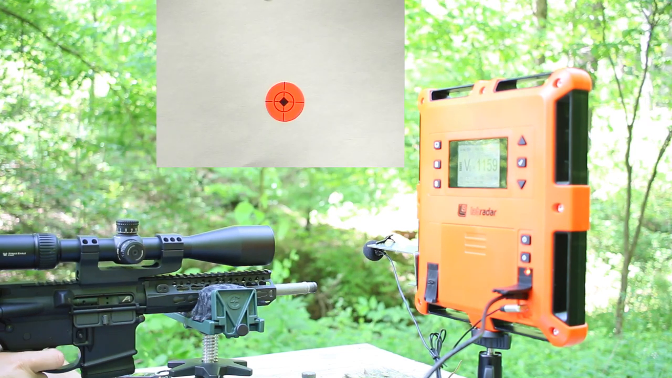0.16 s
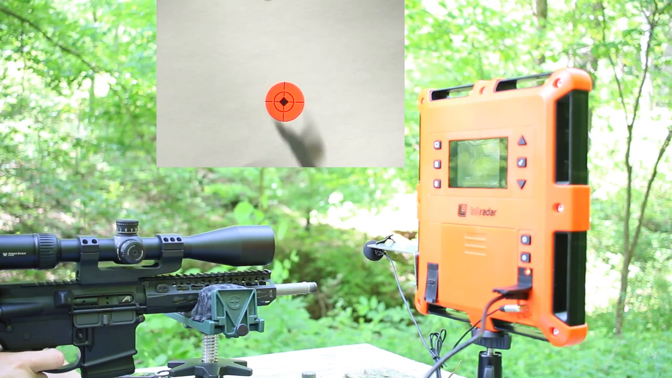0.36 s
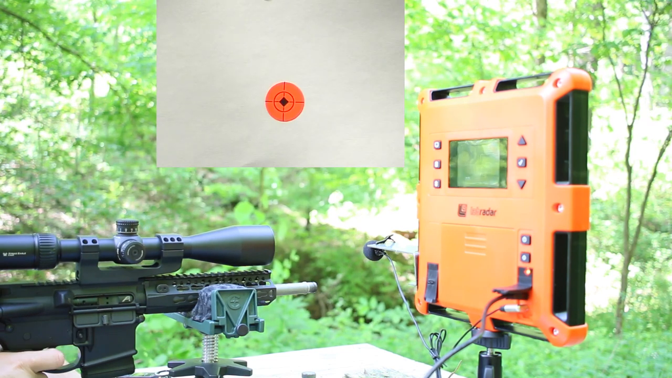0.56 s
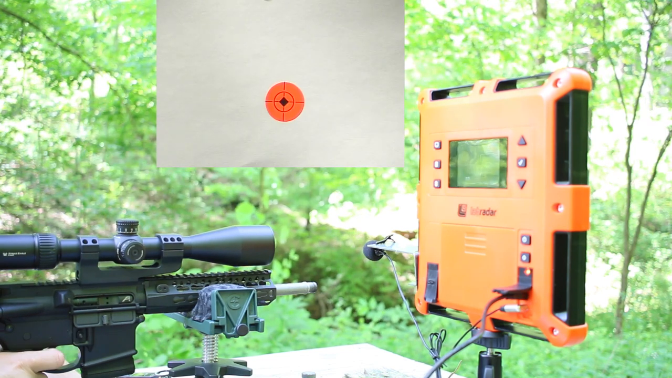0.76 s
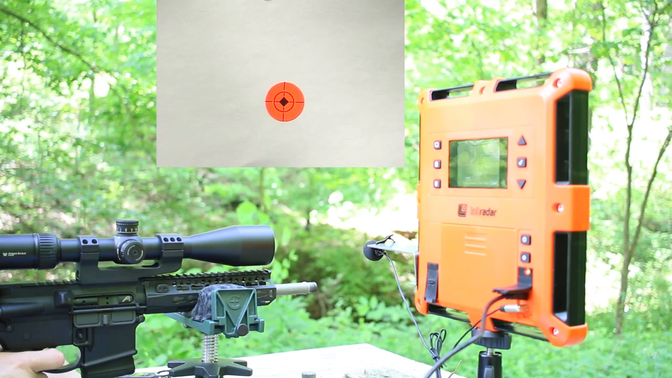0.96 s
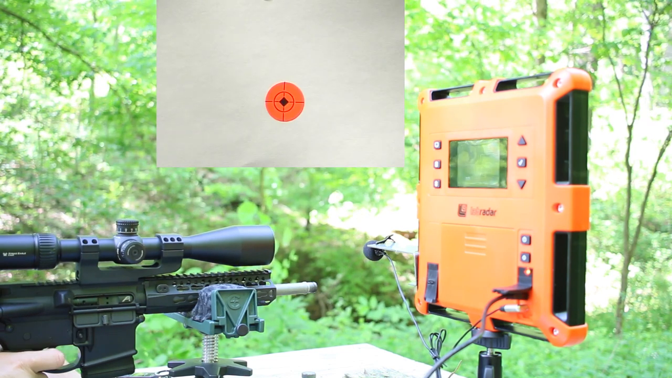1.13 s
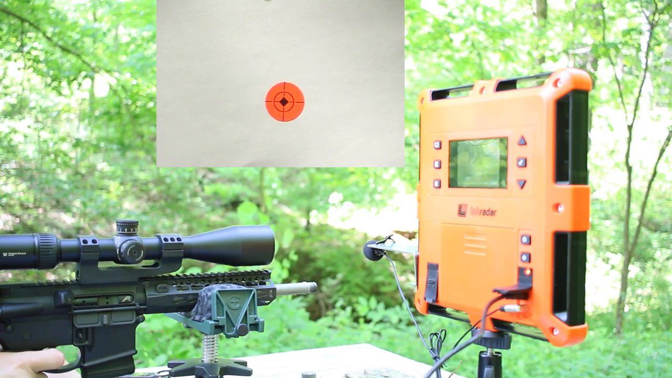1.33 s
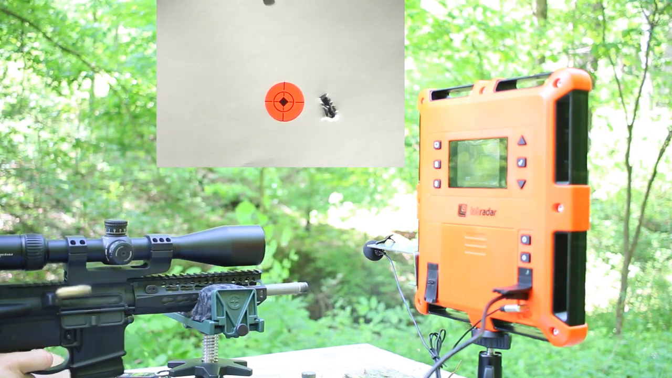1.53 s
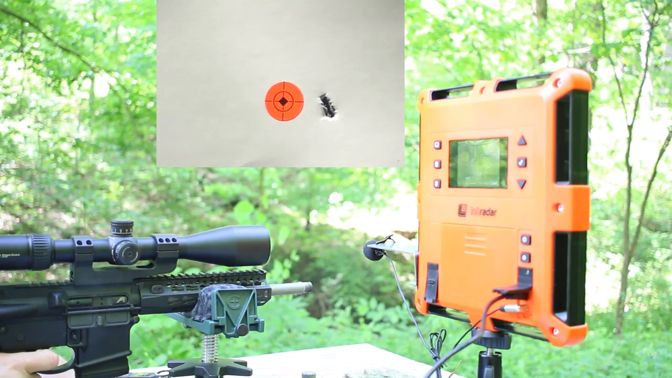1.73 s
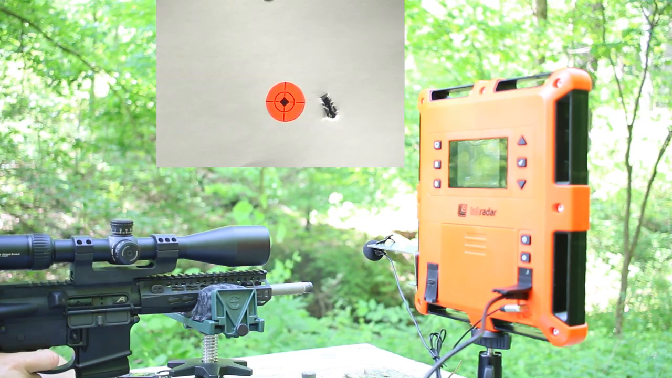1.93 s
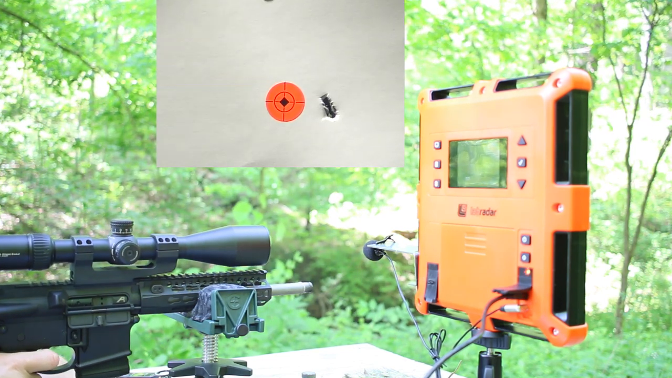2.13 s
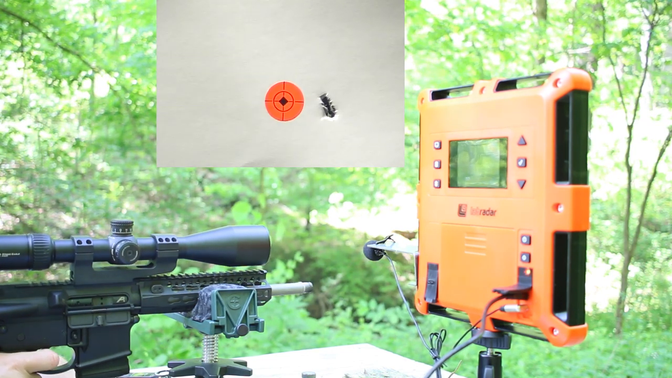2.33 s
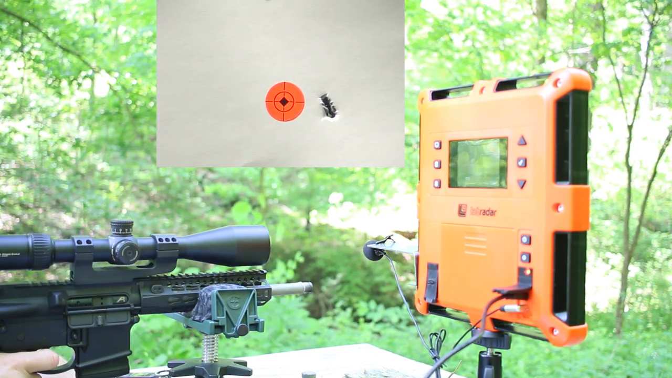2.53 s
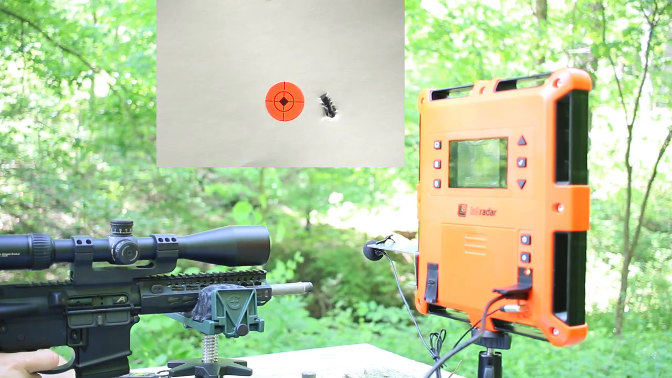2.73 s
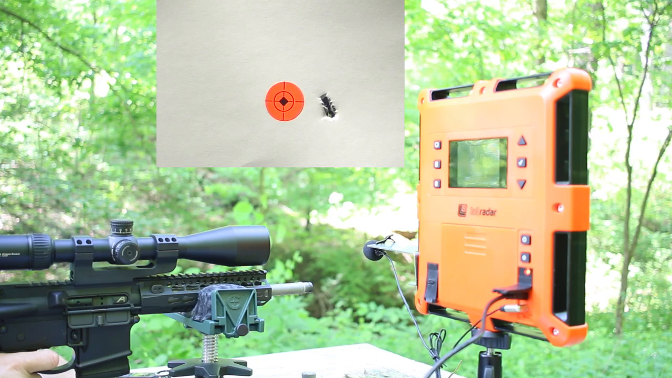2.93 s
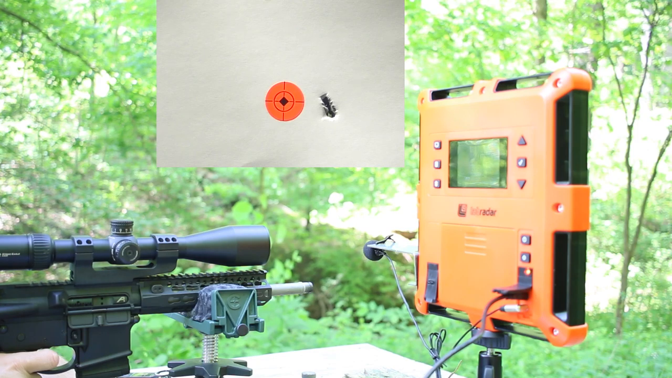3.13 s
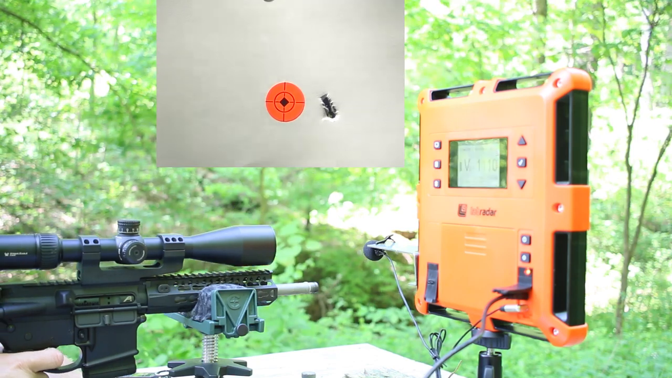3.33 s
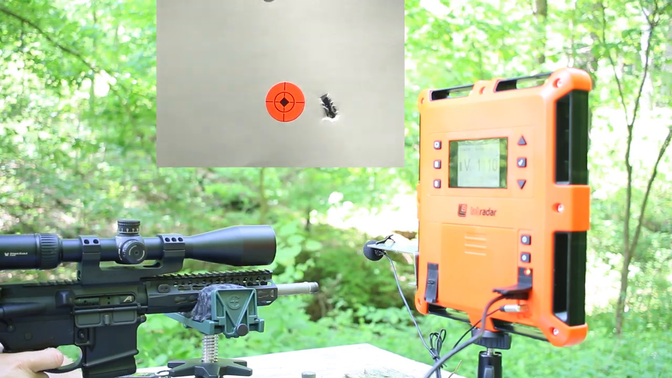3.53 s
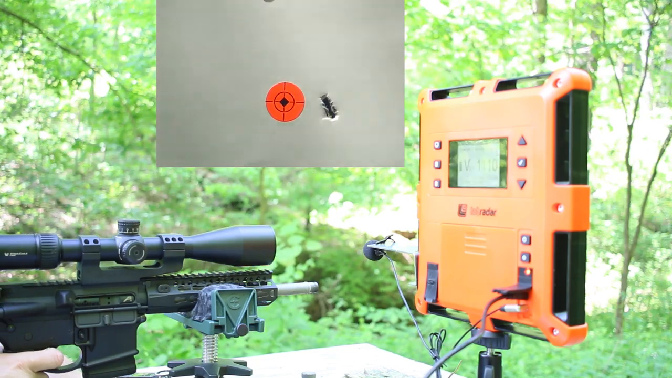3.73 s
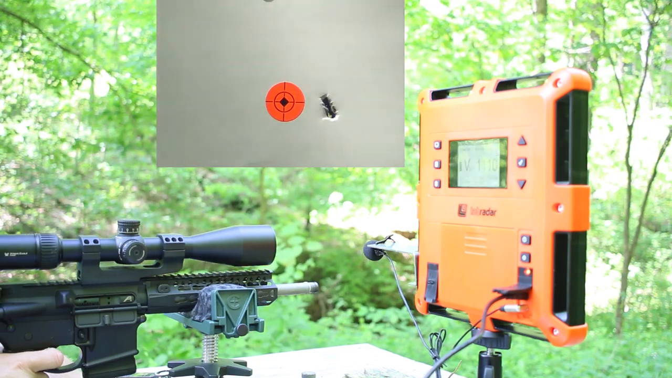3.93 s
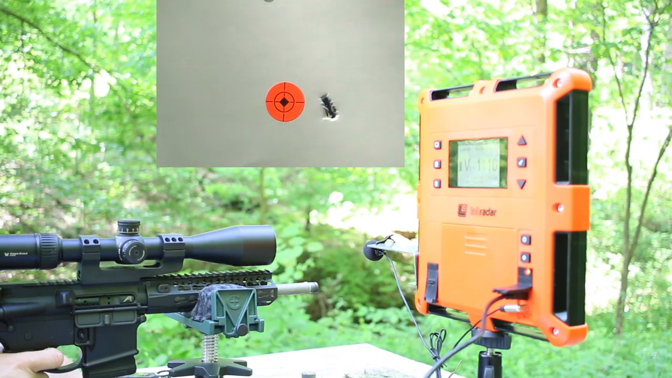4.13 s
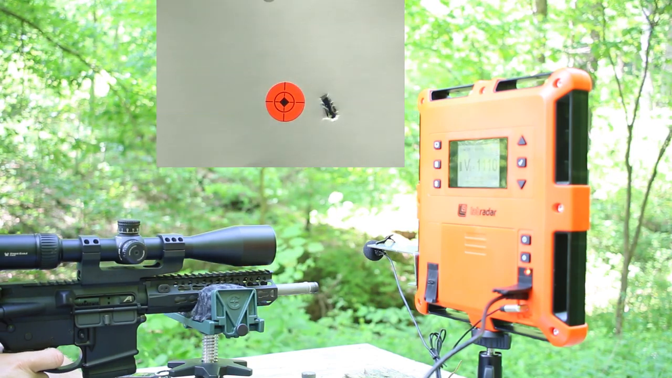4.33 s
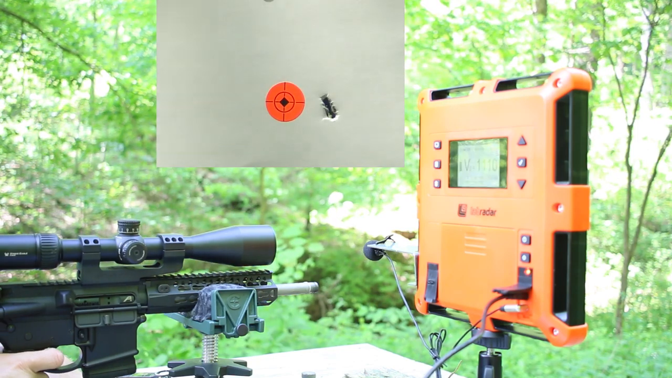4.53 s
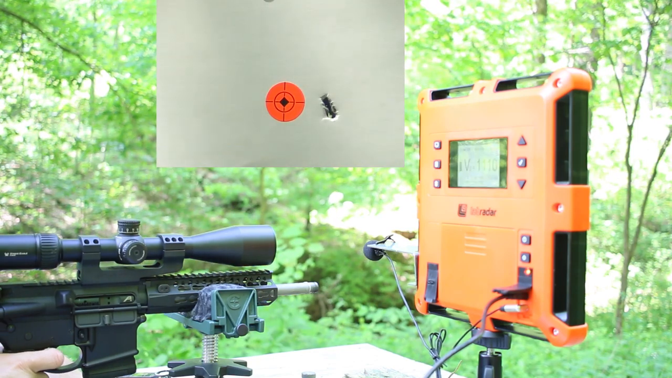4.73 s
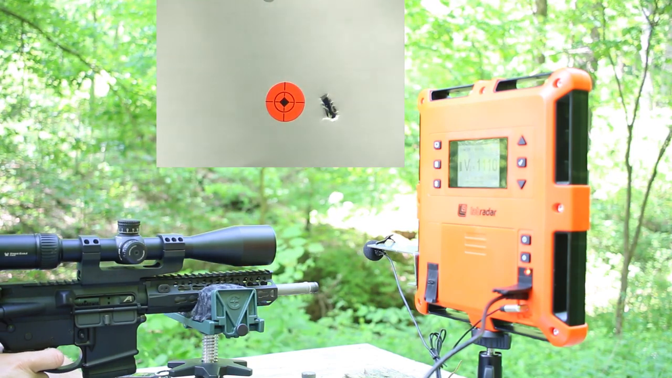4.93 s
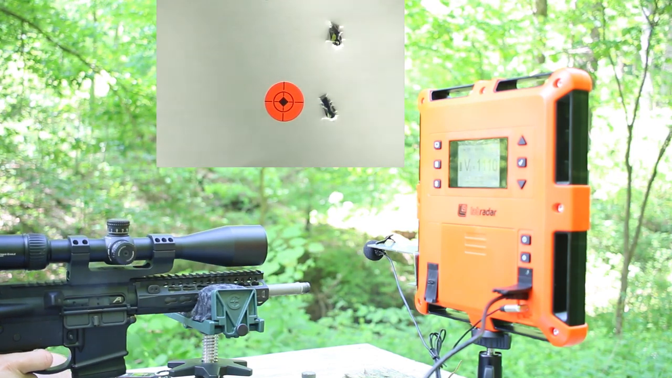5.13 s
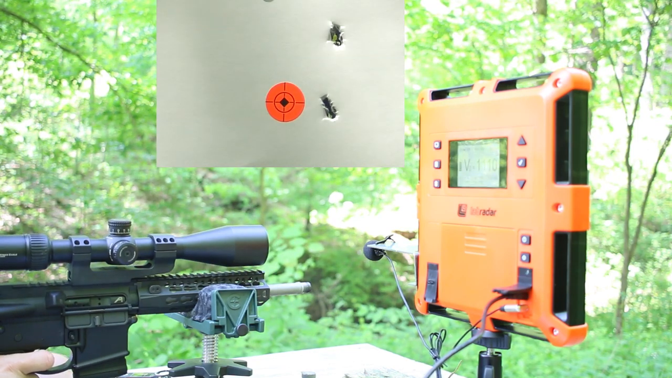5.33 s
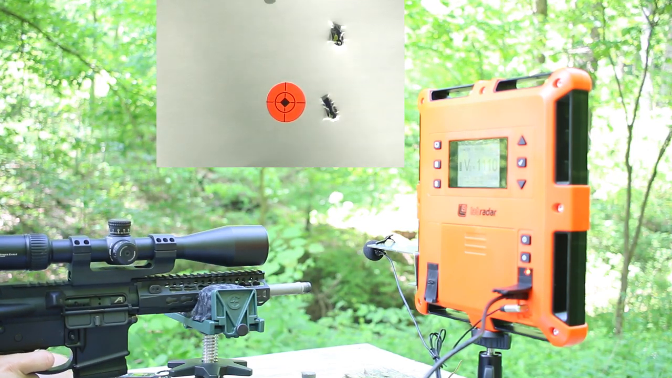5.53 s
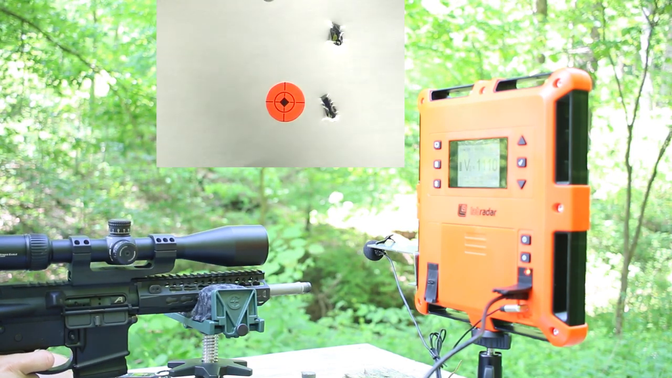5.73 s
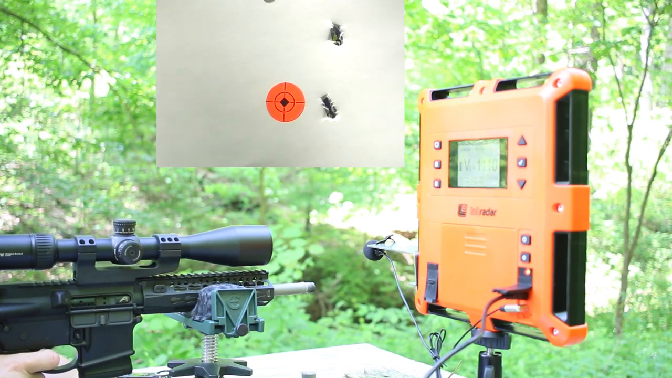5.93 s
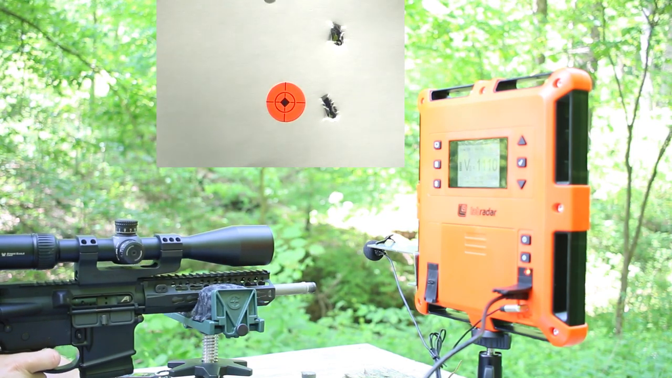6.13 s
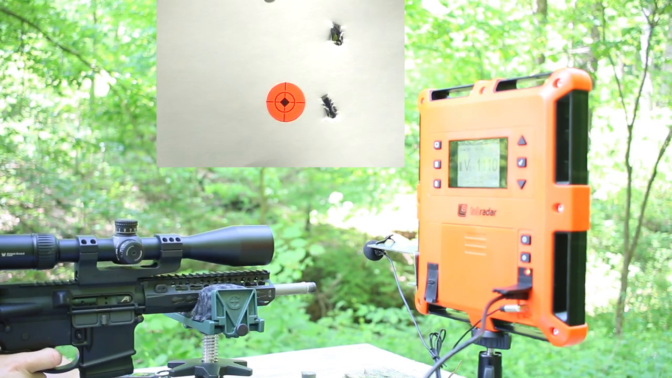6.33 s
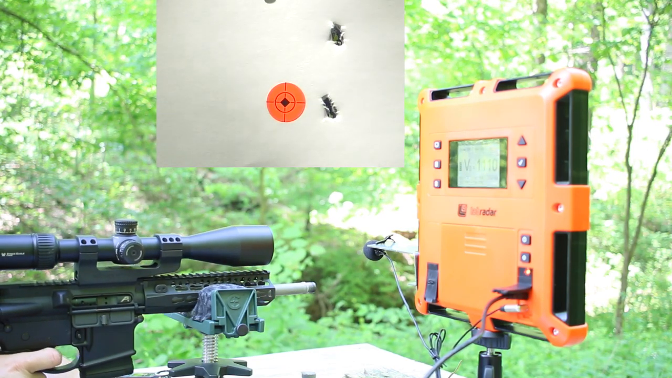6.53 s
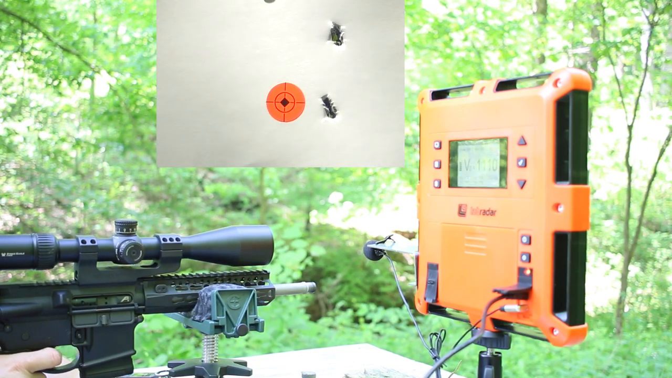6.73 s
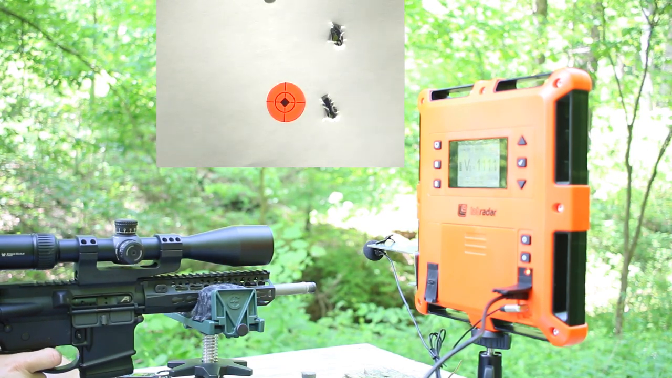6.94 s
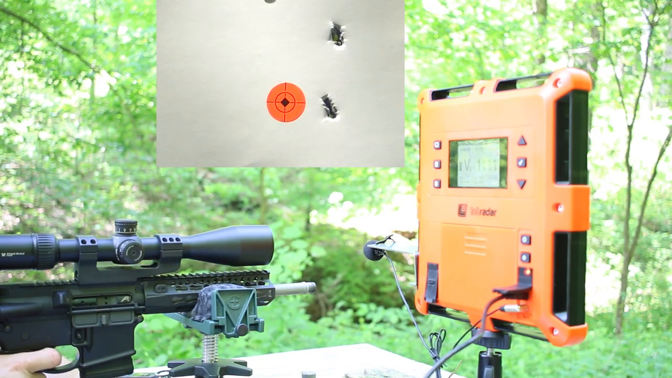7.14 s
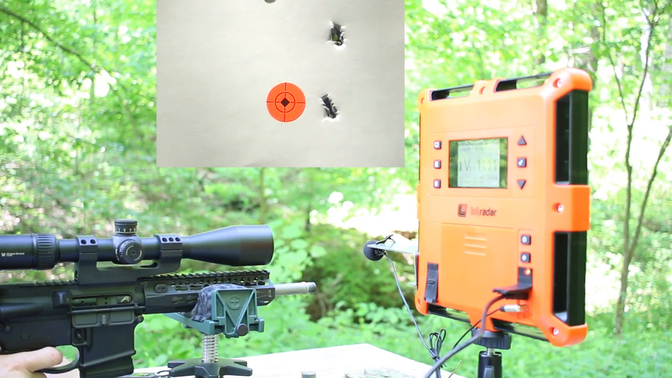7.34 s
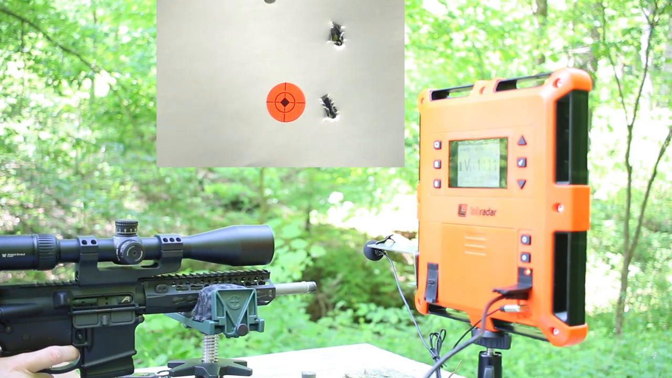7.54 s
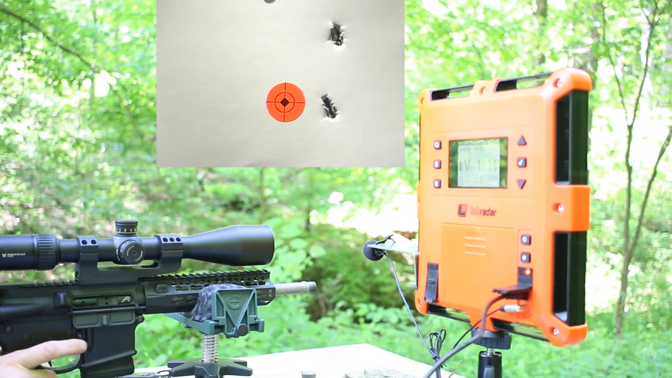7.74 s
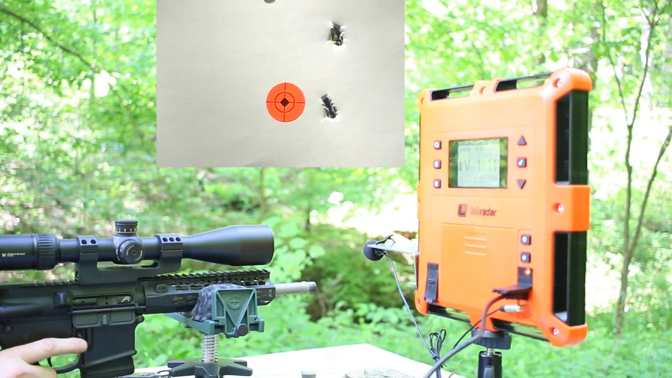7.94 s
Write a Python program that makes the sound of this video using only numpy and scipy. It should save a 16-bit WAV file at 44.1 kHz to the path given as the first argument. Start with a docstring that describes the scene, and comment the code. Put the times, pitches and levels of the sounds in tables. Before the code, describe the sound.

In still woodland air with a very faint hum, a rifle shot cracks right beside the microphone, distorting and rolling away among the trees. A brass case ticks as it lands. A second, equally loud shot follows with its own long echo and tick. As it fades, the trigger gives one crisp steel click, and quiet cloth rustling and small handling bumps finish the sequence.

```python
"""In the woods, a self-loading rifle on a bench fires twice, so close that the microphone overloads.
Hammer, blast and bolt follow within a tenth of a second; trunks and slopes send each bang back as a
long roll that grows duller. Spent cases land, a sleeve rubs over the bench with a few light knocks,
and the trigger resets with a sharp click. Still air and a faint hum lie under it all."""
import sys
import numpy as np
from scipy import signal
from scipy.fft import rfft, irfft
from scipy.io import wavfile
from scipy.ndimage import uniform_filter1d, map_coordinates

SR = 44100
rng = np.random.default_rng(int(sys.argv[2]) if len(sys.argv) > 2 else 0)


def unload_audio(sound):
    """Save the sound as a 16-bit wav file, at the path given as the first command line argument."""
    columns = np.transpose(np.atleast_2d(sound))
    # keep every value between -1 and 1, then stretch to whole-number steps
    steps = np.round(np.clip(columns, -1, 1) * 32767)
    wavfile.write(sys.argv[1], SR, steps.astype(np.int16))


N = 355887

# A "colour" says how strong a sound is at each frequency, from low to high.
# colour of a sharp crack: f/Hz, level/dB
CRACK_COLOUR = [(100, -7.5), (1500, -8.5), (4000, -1), (7000, 1), (9000, -12.5), (16000, -20.5)]
# colour of the steel hammer and bolt: f/Hz, level/dB
STEEL_COLOUR = [(100, -18), (600, -8.5), (1800, -4), (3000, -8), (5000, -4.5), (7000, 1), (9000, -13.5),
                (16000, -24.5)]
# colour of brass and small steel parts: f/Hz, level/dB
TICK_COLOUR = [(100, -18), (1000, -18), (2000, -5), (4000, 2), (7000, 2.5), (9000, -6.5), (16000, -31)]


def amp(db):
    """Turns decibels into a factor to multiply by."""
    return 10 ** (np.asarray(db) / 20)


def evened(x):
    """Scales a signal to an average strength (rms) of 1."""
    return x / np.sqrt(np.mean(x ** 2) + 1e-20)


def read(points, hz):
    """Reads between (frequency, value) points, with octaves evenly spaced."""
    f, value = np.transpose(points)
    return np.interp(np.log(hz + 1), np.log(f + 1), value)


def add(mix, s, sound):
    """Mixes a sound in, starting at s seconds."""
    part = mix[max(round(s * SR), 0):][:len(sound)]
    part += sound[:len(part)]


def clock(size=3 * SR):
    """The time of each sample in seconds."""
    return np.arange(size) / SR


def fade(t, t60):
    """Dies away by 60 dB in t60 seconds, the 'fade time'."""
    return np.exp(-np.log(1000) * t / t60)


def wander(t, count):
    """A wavering line through `count` random points."""
    return np.interp(t, np.linspace(0, t[-1], count), rng.standard_normal(count))


def flicker(db, size, width):
    """A volume that jumps about by roughly `db`, in clumps `width` samples long."""
    return amp(db * evened(uniform_filter1d(rng.standard_normal(size), width)))


def noise(colour, size):
    """Steady noise with the given colour."""
    gain = amp(read(colour, np.fft.rfftfreq(size, 1 / SR)))
    return evened(irfft(rfft(rng.standard_normal(size)) * gain, size))


def pulse(colour, size=2048):
    """One click with the given colour and a peak of 1."""
    log_gain = np.log(amp(read(colour, abs(np.fft.fftfreq(size, 1 / SR)))))
    spectrum = np.exp(np.conj(signal.hilbert(log_gain)))  # packs the energy at the start
    shape = np.fft.ifft(spectrum).real[:size // 2]
    return shape / abs(shape).max()


def burst(colour, db, rise, size=16384):
    """Noise that swells for `rise` seconds and dies away."""
    u = clock(size) / rise
    swell = (u * np.exp(1 - u)) ** 2
    sound = noise(colour, size) * swell
    return amp(db) * sound * np.linalg.norm(swell) / np.linalg.norm(sound)


def strike(colour, t60, scatter, size=8192):
    """A click trailed by a spray of small ones, together as strong as one pulse."""
    spray = rng.standard_normal(size) * fade(clock(size), t60)
    hits = scatter * spray / np.linalg.norm(spray)
    hits[0] += 1
    click = pulse(colour)
    sound = signal.fftconvolve(hits, click)
    return sound * np.linalg.norm(click) / np.linalg.norm(sound)


def knock(db, hz, t60):
    """A blow: one tone that dies quickly."""
    t = clock(16384)
    return amp(db) * np.sin(2 * np.pi * hz * t) * fade(t, t60)


def air_and_hum():
    """Still air and a faint, nearly steady hum."""
    # tones of the hum: f/Hz, level/dB
    tones = [(116.5, -76.5), (233, -79.5), (1400, -93)]
    # colour of the still air: f/Hz, level/dB
    air_colour = [(25, -2.5), (60, -7), (105, -7.5), (150, -18.5), (250, -17.5), (320, -20), (480, -17.5),
                  (750, -23.5), (1050, -29.5), (1900, -31), (2600, -37), (7000, -38), (9500, -46),
                  (15500, -58)]
    t = clock(N)
    drift = 0.14 * wander(t, count=40)
    hum = sum(amp(db) * np.sqrt(2) * np.sin(2 * np.pi * (hz * t + drift)) for hz, db in tones)
    return amp(-67) * noise(air_colour, N) + hum


def hammer():
    """The hammer falls, steel on steel."""
    return burst(STEEL_COLOUR, db=-14, rise=0.0017)


def blast():
    """Gas bursts out of the barrel with a boom and a crack."""
    # colour of the boom: f/Hz, level/dB
    boom_colour = [(25, -4), (100, -9), (300, -4.5), (540, 3.5), (680, -4.5), (850, 0.5), (1200, -8),
                   (2200, -14.5), (5000, -33), (16000, -57)]
    sound = np.zeros_like(clock())
    add(sound, 0, amp(13.5) * pulse(boom_colour))  # the shock wave
    add(sound, 0, burst(CRACK_COLOUR, db=16.5, rise=0.0014))  # the crack of bullet and gas
    add(sound, 0, burst(boom_colour, db=11, rise=0.0085))  # the gas cloud swells
    add(sound, 0, knock(db=-0.5, hz=31.3, t60=0.084))  # its low push and suck
    add(sound, 0, burst(CRACK_COLOUR, db=-4, rise=0.028))  # the crack off the nearest leaves
    return sound


def scattered(bands, patchy_db, size=512):
    """Countless tiny echoes arrive in clumps; each frequency fades at its own speed."""
    bands, length = np.array(bands), len(clock())
    echoes = evened(rng.standard_normal(length) * flicker(patchy_db, length, width=500))
    hz, t, spectra = signal.stft(echoes, SR, nperseg=size, noverlap=size * 3 // 4)
    colour = evened(amp(read(bands[:, :2], hz)))[:, None]
    t60 = read(bands[:, ::2], hz)[:, None]
    spectra *= colour * fade(t, t60)
    return signal.istft(spectra, SR, nperseg=size, noverlap=size * 3 // 4)[1][:length]


def woods_roll(groves_db=1.48):
    """Nearby bushes scatter the bang briefly; the far woods keep it rolling."""
    # the answer of the bushes: f/Hz, level/dB, fade time/s
    near_bands = [(30, -10.5, 0.25), (100, -11.5, 0.56), (200, -5, 0.95), (402, 0.5, .7), (850, -1, 0.78),
                  (1220, -5.5, 0.83), (1950, 2, .65), (2430, -11.5, .7), (4470, -9, .65), (7000, -7, .6),
                  (8740, -15.5, .5), (15000, -26.5, 0.33)]
    # the answer of the far woods: f/Hz, level/dB, fade time/s
    far_bands = [(30, -29.5, 1.7), (130, -28, 3.7), (250, -19, 2.9), (396, -2.5, 2.2), (535, 1.5, 2.7),
                 (670, -7, 2.6), (820, -7, 2.6), (960, -14.5, 2.4), (1950, -13.5, 1.9), (2580, -22.5, 1.65),
                 (4000, -21.5, 1.4), (6900, -21, 1.3), (9500, -38, 1.1), (15000, -51, .75)]
    near = amp(1.26) * scattered(near_bands, patchy_db=0.5)
    far = amp(-13.5) * scattered(far_bands, patchy_db=1)
    groves = amp(groves_db * wander(clock(), count=110))  # thicker and thinner stands of trees
    return near + far * groves


def echo(delay, db, t60, scatter):
    """The bang bounces off something rough, duller the farther it has travelled."""
    # what the air leaves of an echo: f/Hz, level/dB, loss on the way/(dB per s)
    bands = [(40, -20.5, 20.5), (150, -16, 26.5), (290, -9, 16), (400, 0, 4), (570, 1, 3), (810, -6, 7),
             (1100, -14.5, 15), (2000, -14.5, 21), (3000, -28, 30.5), (7000, -35, 34), (16000, -67.5, 40)]
    colour = [(hz, level_db - loss * delay) for hz, level_db, loss in bands]
    return amp(db) * strike(colour, t60, scatter)


def trunk_echoes(per_s=30, length_s=2, clearing_s=0.067, leaves_db_per_s=14):
    """Single trunks answer; sound weakens as it spreads past the clearing and through leaves."""
    out = np.zeros_like(clock())
    for k, (place, size) in enumerate(rng.random((per_s * length_s, 2))):
        delay = (k + 0.5 + place) / per_s
        loss_db = 20 * np.log10(np.hypot(1, delay / clearing_s)) + leaves_db_per_s * delay
        trunk_db = 2.5 + 3 * (2 * size - 1)
        add(out, delay, echo(delay, trunk_db - loss_db, t60=0.072, scatter=1.6))
    return out


def bolt():
    """The bolt, the sliding block that closes the barrel, slams home and jolts the bench."""
    sound = burst(STEEL_COLOUR, db=4, rise=0.004)
    add(sound, 0.004, knock(db=-6, hz=40, t60=0.1))
    return sound


def slope_echoes():
    """Slopes and tree lines each send back a clear echo."""
    # one row an echo: delay/s, level/dB, fade time/s
    slopes = [(.118, 0, .075), (.175, -4.5, .09), (.2508, -2.5, .03), (.345, -10.5, 0.11), (.410, -6, .015),
              (.424, -12.5, 0.11), (.704, -13, 0.048), (.787, -15.5, 0.046), (1.137, -28, .045)]
    out = np.zeros_like(clock())
    for delay, db, t60 in slopes:
        add(out, delay, echo(delay, db, t60, scatter=0.98))
    return out


def stirred(sound, shift_s=0.00006):
    """Drifting air makes each part of the sound arrive a little early or late."""
    samples = np.arange(len(sound))
    return map_coordinates(sound, [samples + shift_s * SR * wander(samples, count=300)], order=5)


def rifle():
    """Each shot is hammer, bang and bolt; both bangs cross the same woods."""
    # one row a shot: t/s, level/dB, time its roll is cut off/s
    shots = [(1.5591, 0, 3.335), (5.0753, 0, 9.5)]
    bang = woods_roll() + blast() + slope_echoes() + trunk_echoes()
    out = np.zeros(N)
    for s, db, stop in shots:
        shot = np.zeros(N)
        add(shot, s, stirred(bang))
        add(shot, s - 0.0045, hammer())
        add(shot, s + 0.079, bolt())
        cut_off = np.clip((stop - clock(N)) / 0.0055, 0, 1)
        out += amp(db) * shot * cut_off
    return out


def metal_ticks():
    """Spent cases land and small parts of the gun tick."""
    # one row a tick: t/s, level/dB, fade time/s
    ticks = [(2.0948, -22, 0.0092), (2.7144, -50, .03), (3.0244, -44, 0.0073), (5.6093, -18, 0.01),
             (6.628, -55, .04), (6.724, -54, 0.06), (7.565, -39, .12), (7.743, -37, 0.013)]
    out = np.zeros(N)
    for s, db, t60 in ticks:
        add(out, s, amp(db) * strike(TICK_COLOUR, t60, scatter=1.4))
    return out


def sleeve(snags_per_s=90, rise_s=0.09, fade_s=0.18):
    """Cloth catches and slips in tiny steps, snags its threads and shakes the bench."""
    # strokes of the arm: t/s, length/s, hiss level/dB, rumble level/dB (both relative)
    strokes = [(2.66, .45, -73, -70), (5.87, 0.21, -59.5, -72), (6.42, .2, -74, -71),
               (7.33, 0.19, -62.5, -62), (7.492, .11, -57, -53.5), (7.619, .14, -59, -56),
               (7.775, 0.16, -61, -69), (7.96, .11, -76, -72)]
    # colour of rubbed cloth: f/Hz, level/dB
    cloth_colour = [(100, -11), (500, 6), (1000, 2), (1700, -4.5), (3000, -10.5), (4500, -4.5), (7000, 1.5),
                    (9000, -13), (15000, -23)]
    # colour of the rumbling bench: f/Hz, level/dB
    bench_colour = [(25, 3), (70, -0.5), (200, -7.5), (350, -6), (800, -27), (4000, -59.5)]
    rub, shake = np.zeros((2, N))
    t = clock(SR)
    for s, length, hiss_db, rumble_db in strokes:
        # the arm speeds up, keeps going, then comes to rest
        speed = np.minimum(t / rise_s, 1) * fade(np.maximum(t - length, 0), fade_s)
        add(rub, s, amp(hiss_db) * speed)
        add(shake, s, amp(rumble_db) * speed)
    grains = evened(flicker(1.5, N, width=120))
    snags = rng.standard_normal(N) * (rng.random(N) < snags_per_s / SR)
    crackle = evened(signal.oaconvolve(snags, pulse(cloth_colour))[:N])
    cloth = noise(cloth_colour, N) * grains + amp(-9) * crackle
    return cloth * rub + amp(-4) * noise(bench_colour, N) * shake


def light_knocks():
    """The trigger's reset thuds through the rifle; a hand bumps the rifle and the bench."""
    # one row a knock: t/s, level/dB, f/Hz, fade time/s
    knocks = [(2.745, -42.5, 190, .05), (6.258, -42, 70, 0.14), (6.2571, -24, 417, 0.012),
              (7.3474, -61, 4370, 0.018), (7.512, -40, 193, 0.032), (7.673, -47.5, 110, .04),
              (7.7052, -30, 720, 0.0071), (7.7439, -31.5, 1900, 0.0021), (7.820, -43, 550, .008),
              (7.945, -53, 1680, 0.033), (7.972, -46.5, 430, 0.023)]
    out = np.zeros(N)
    for s, db, hz, t60 in knocks:
        add(out, s, knock(db, hz, t60))
    return out


def trigger_reset(rise_s=0.00043):
    """The trigger's catch snaps back and rings the rifle's body; bushes and trees answer faintly."""
    # the click: t/s, level/dB
    reset = (6.2567, 0)
    # ringing tones of the metal body: f/Hz, relative level/dB, fade time/s
    tones = [(799, -25, 0.022), (1626, -8, 0.0073), (1780, -10.5, 0.0076), (2640, -16, 0.0047),
             (3530, -9, 0.0042), (5040, -0.5, 0.0093), (5610, -2.5, 0.006), (6400, -13.5, 0.011),
             (6690, -8.5, 0.0074), (7460, -4, 0.0058), (8570, -5.5, 0.0061), (9300, -15, 0.0063)]
    t = clock(32768)
    ring = sum(amp(db) * np.sin(2 * np.pi * (hz * t + rng.random())) * fade(t, t60)
               for hz, db, t60 in tones)
    snap = amp(-4.5) * noise(TICK_COLOUR, len(t)) * fade(t, 0.011)
    click = (amp(6.5) * ring + snap) * (1 - np.exp(-t / rise_s))
    answer = noise(CRACK_COLOUR, len(t)) * (amp(-44) * fade(t, 0.14) + amp(-60.5) * fade(t, 0.9))
    start, level_db = reset
    out = np.zeros(N)
    add(out, start, amp(level_db) * (click + answer))
    return out


def scene():
    """All the sounds meet at one microphone."""
    return (rifle() + trigger_reset() + metal_ticks() + light_knocks() + sleeve() + air_and_hum())[None]


def record(dry):
    """The overload flattens the loudest peaks; then everything above 16 kHz is filtered away."""
    clipped = np.clip(dry, -1, 1)
    low_pass = signal.firwin(511, 16000, window=("kaiser", 9), fs=SR)
    return signal.oaconvolve(clipped, low_pass[None], "same")


dry = scene()
out = record(dry)
unload_audio(out)
```